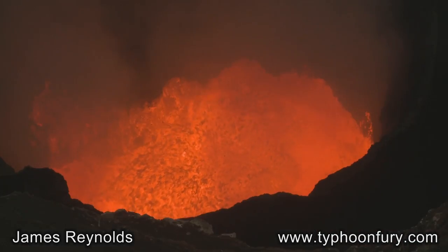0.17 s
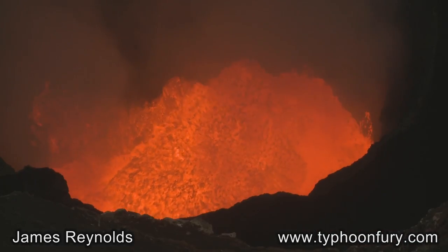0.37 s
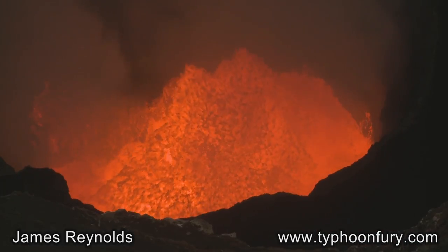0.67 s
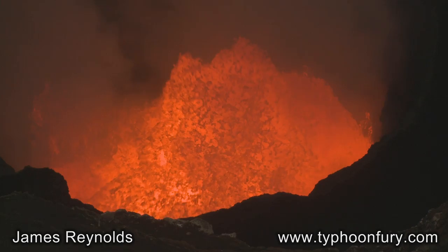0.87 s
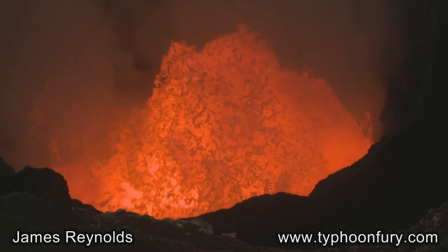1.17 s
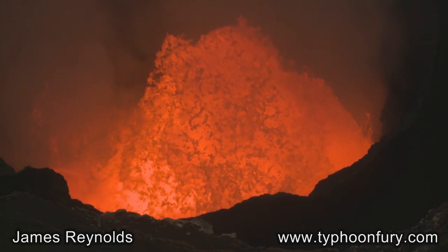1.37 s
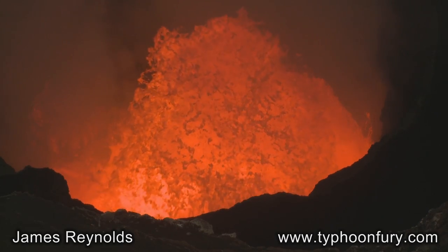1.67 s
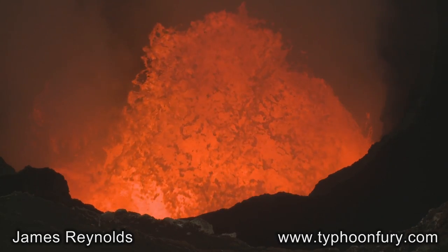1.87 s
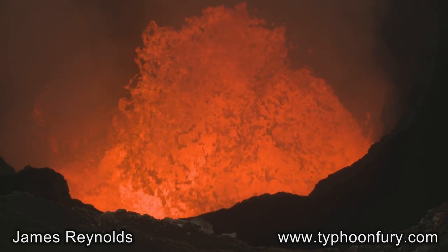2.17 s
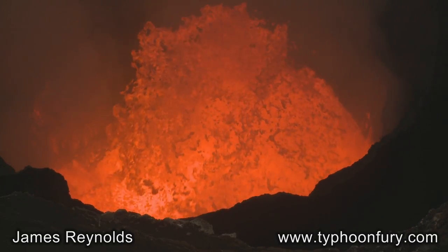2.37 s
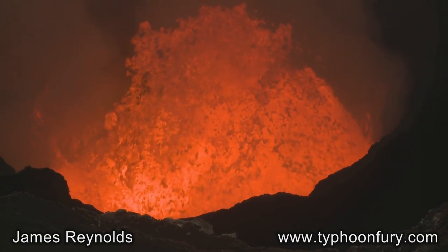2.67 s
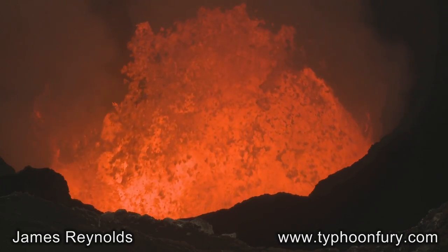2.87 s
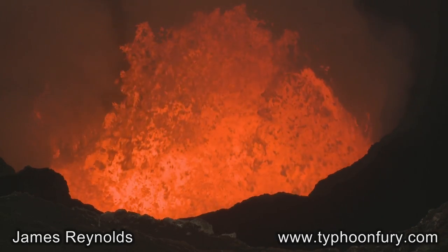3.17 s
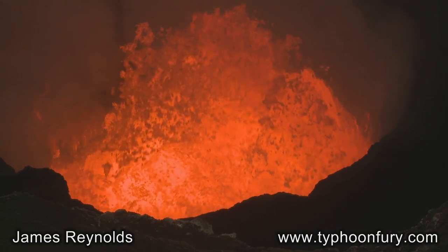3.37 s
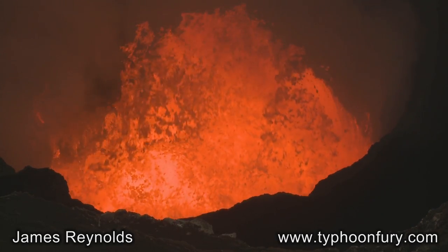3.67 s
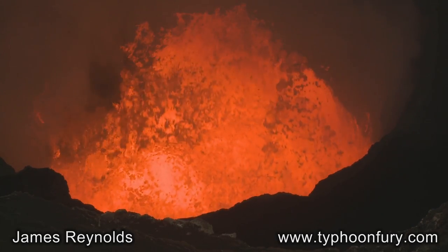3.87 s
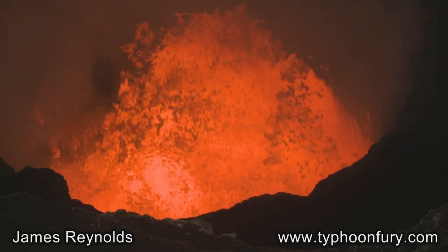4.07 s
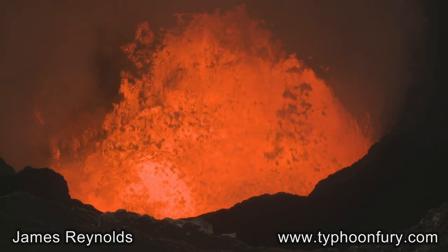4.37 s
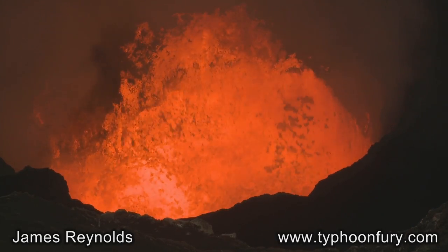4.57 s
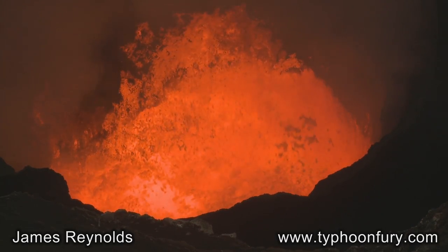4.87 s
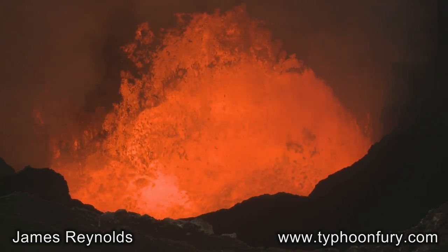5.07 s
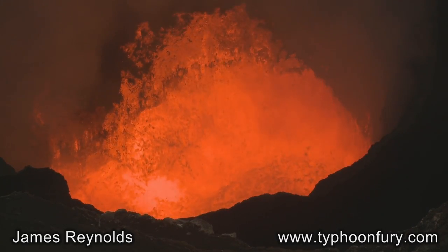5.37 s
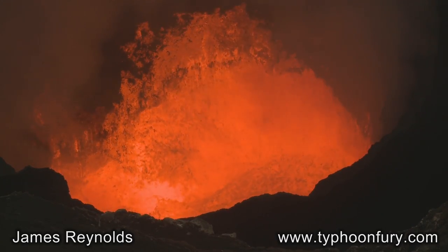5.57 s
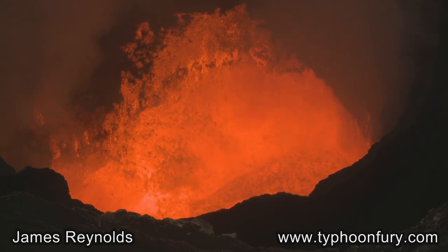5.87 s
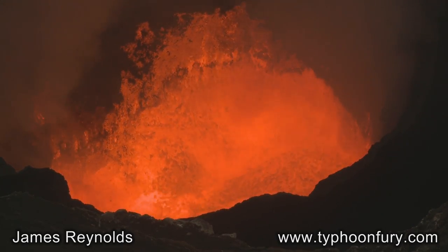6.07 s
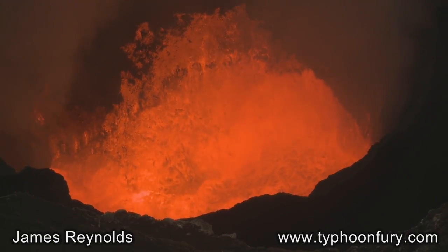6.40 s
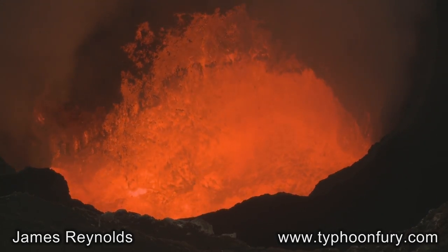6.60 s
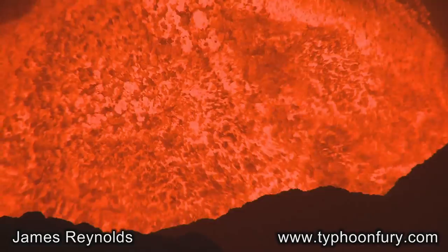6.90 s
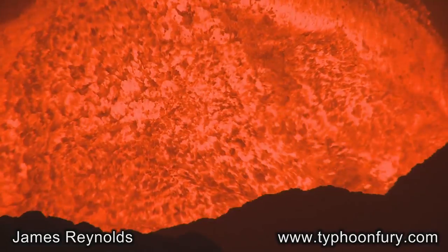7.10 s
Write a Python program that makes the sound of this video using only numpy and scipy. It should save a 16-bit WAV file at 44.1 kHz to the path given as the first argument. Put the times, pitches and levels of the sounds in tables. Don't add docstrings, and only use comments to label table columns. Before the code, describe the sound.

A churning lava lake gives a deep, uneven rumble and dull gassy roar with sparse grit ticks, then cuts abruptly to a windy wider view.

```python
import sys
import numpy as np
from scipy import signal
from scipy.fft import rfft, irfft, next_fast_len
from scipy.io import wavfile
from scipy.ndimage import uniform_filter1d, map_coordinates

SR = 44100
rng = np.random.default_rng(int(sys.argv[2]) if len(sys.argv) > 2 else 0)


def level_to_linear(level):
    exponent = np.asarray(level, float) / 20
    return 10 ** exponent


def materialize(psi):
    bounded = np.clip(np.atleast_2d(psi).T, -1, 1)
    quanta = np.round(bounded * 32767).astype(np.int16)
    wavfile.write(sys.argv[1], SR, quanta)


N = 319279
CUT_S = 6.937


def unit(x):
    return x / np.sqrt(np.mean(x ** 2) + 1e-20)


def along(points, hz):
    f, v = np.transpose(points)
    return np.interp(np.log(hz + 1), np.log(f + 1), v)


def curves(rows):
    s, *cols = np.transpose(rows)
    return [np.interp(np.arange(N) / SR, s, c) for c in cols]


def wobble(rate_hz):
    knots = rng.standard_normal(int(N * rate_hz / SR) + 4)
    return map_coordinates(knots, [np.arange(N) * rate_hz / SR])


def filtered(x, response):
    m = next_fast_len(N + 8192)
    return irfft(rfft(x, m) * response(np.fft.rfftfreq(m, 1 / SR)), m)[..., :N]


def rush(spectrum, patchy_db):
    z = signal.stft(rng.standard_normal(N), nperseg=512)[2]
    field = uniform_filter1d(rng.standard_normal(z.shape), size=5, axis=0)
    field = uniform_filter1d(field, size=10, axis=1)
    patched = signal.istft(z * level_to_linear(patchy_db * unit(field)), nperseg=512)[1][:N]
    return unit(filtered(patched, lambda hz: level_to_linear(along(spectrum, hz))))


def steady(x):
    swell = uniform_filter1d(uniform_filter1d(x ** 2, size=4000), size=4000)
    return unit(x / (np.abs(swell) + .05) ** .4)


def strikes(rows, scatter):
    out = np.zeros(N + SR)
    t = np.arange(2048) / SR
    for s, db, hz, crack_db, t60_s in rows:
        shape = level_to_linear(db - 60 * t / t60_s) * (1 - np.exp(-t / 0.00025))
        drift = np.cumsum(scatter * rng.standard_normal(len(t)))
        ring = np.sin(2 * np.pi * hz * t + drift)
        crack = level_to_linear(crack_db + 2) * np.diff(rng.standard_normal(len(t) + 1))
        out[round(s * SR):][:len(t)] += 3 * shape * (ring + crack)
    return out[:N]


def slugs():
    # (time [s], swell [dB], length [s], reach into the rumble [ratio])
    bursts = [(0.01, 8, .08, 0.66), (0.108, -5.5, 0.087, 0.13), (.43, -5, 0.083, 0.27),
              (0.617, -6, 0.062, 0.03), (0.735, 2, .07, 0.07), (.97, 2.5, .12, 1.2), (1.316, 4.5, 0.062, 0),
              (1.445, -4, 0.075, 0), (1.575, -2, 0.05, 0.01), (1.712, 4.5, 0.15, 0.03),
              (2.376, 0.5, 0.072, 1.1), (2.627, 5.5, .09, 0.6), (2.821, 3, 0.14, 0.16),
              (2.977, -4.5, 0.1, .5), (3.497, 3.5, 0.074, 0.06), (3.789, 3, 0.12, 0.52),
              (3.891, -4.5, 0.067, 0), (3.992, 8, 0.063, 0), (4.08, -5, 0.066, 0),
              (4.395, 5.5, 0.086, 0.08), (4.494, 3.5, .07, 0.03), (4.836, -1.5, 0.083, 1.9),
              (4.93, 3, 0.17, 0.99), (5.27, 3.5, 0.06, 0.4), (5.654, 2.5, .08, .3), (6.01, 5.5, 0.13, 0.55),
              (6.171, -1.5, .1, 0.83), (6.472, 2.5, 0.16, 0.94), (6.583, -4, .06, 0),
              (6.857, 7, 0.062, 0.26)]
    s, db, length_s, reach = np.transpose(bursts)
    t = np.arange(0, N, 64) / SR
    bell = db[:, None] * np.exp(-4 * ((t - s[:, None]) / length_s[:, None]) ** 2)
    deep_db, upper_db = bell.sum(0), reach @ bell
    return [np.interp(np.arange(N) / SR, t, c) for c in (deep_db, upper_db)]


def heave(level_db):
    # (frequency [Hz], density [dB per Hz])
    spectrum = [(4.7, -32), (8.0, 1), (32, 1.5), (90, -10), (120, -36), (200, -120)]
    return level_to_linear(level_db + 7.0) * steady(rush(spectrum, patchy_db=1.0))


def rumble(level_db):
    # (frequency [Hz], density [dB per Hz])
    spectrum = [(29, -27.5), (50, -1), (124, -6.5), (196, -12.5), (249, -24), (300, -23.5), (390, -48),
                (660, -120)]
    return level_to_linear(level_db + 3.0) * steady(rush(spectrum, patchy_db=-2.0))


def roar(level_db, burst):
    # (frequency [Hz], density [dB per Hz])
    spectrum = [(140, -28.5), (230, -0.5), (259, -5), (376, -2), (495, -10.5), (622, -7), (782, -16),
                (891, -15.5), (1200, -22), (1560, -52), (2640, -120)]
    return level_to_linear(level_db - 10.0 + .6 * burst) * rush(spectrum, patchy_db=0.84)


def gas(level_db, burst):
    # (frequency [Hz], density [dB per Hz])
    spectrum = [(800, -26.5), (1050, -3.5), (1330, -2.5), (1440, 0.5), (1680, -8.5), (2000, -4.5),
                (2280, -7), (2500, -6.5), (2700, -10.5), (2900, -17), (3800, -18), (5000, -25.5),
                (16000, -38.5)]
    return level_to_linear(level_db - 24.0 + 0.5 * burst) * rush(spectrum, patchy_db=1.25)


def lead_in():
    # (time [s], level [dB])
    fade = [
        (0, -45),
        (.008, -55.5),
        (.036, -56.5),
        (.044, -88),
    ]
    spectrum = [(150, -31), (350, 12), (1200, -12), (1750, 7), (2300, -14), (3400, 0.5),
                (4500, -9.0), (15000, -27.0)]
    return level_to_linear(curves(fade)[0]) * rush(spectrum, patchy_db=0.5)


def lake():
    # (time [s], churning [dB], venting [dB])
    activity = [(0, -40.5, -2), (.5, -41.5, -0.5), (1.1, -41.5, 0.5), (2.0, -44, -0.5), (2.6, -41.5, -0.5),
                (3.1, -42.5, 1), (4.3, -39.5, 0), (4.8, -39, -0.5), (5.4, -39.5, 2), (6.1, -38.5, 4),
                (6.5, -39, 5.5), (6.93, -42.5, 2)]
    churn_db, vent_db = curves(activity)
    deep_db, upper_db = slugs()
    mean_db = churn_db.mean()
    roar_db = mean_db + 0.6 * (churn_db - mean_db) + 0.5 * vent_db + 0.6 * upper_db
    burst = wobble(7)
    low = heave(churn_db + deep_db) + rumble(churn_db + upper_db)
    high = roar(roar_db, burst) + gas(mean_db + vent_db, burst)
    return low + high + lead_in()


def idle_track():
    spectrum = [(1, -14), (6, 0), (20, -9), (200, -28), (1000, -50)]  # (Hz, dB per Hz)
    drift = level_to_linear(-87) * rush(spectrum, patchy_db=.1)
    return level_to_linear(-86.5) + drift + level_to_linear(-89) * rng.standard_normal(N)


def grit(count, db):
    draw = rng.random((count, 3))
    rows = [(s * CUT_S, db + 9 * size, 1800 * 1.8 ** pitch, -14, .009) for s, size, pitch in draw]
    return strikes(rows, scatter=0.089)


def tent():
    # (time [s], level [dB])
    gust = [
        (.15, -94),
        (.3, -67.5),
        (.6, -74.5),
        (.82, -67.5),
        (.95, -92),
    ]
    # (frequency [Hz], density [dB per Hz])
    spectrum = [(1300, -42), (1900, 2), (2500, -1), (3000, -9.5), (4800, -12.5), (5600, -25), (9000, -81)]
    return level_to_linear(curves(gust)[0] + 1.6 * wobble(40)) * rush(spectrum, patchy_db=4.0)


def ticks():
    # (time [s], peak level [dB], third mode [dB], high modes [dB])
    hits = [(0.181, -64, -2, 1), (0.2488, -60, -14, -1), (0.846, -68, 8, -21), (1.3359, -63, -18, -17),
            (1.718, -56, -8, -19), (2.2223, -64, 3, -4), (2.4075, -65, 4.5, -18), (2.433, -58, -10, -19),
            (2.4928, -49.5, -3, -1), (3.1542, -57, -18, -17), (3.484, -61, 1.5, -6.5),
            (3.83, -59.5, -1, 2.5), (4.0425, -58.5, 2.5, -21), (4.361, -56, -7, -13), (4.802, -67, 5, -13),
            (5.04, -60.5, 3, -24), (6.031, -57.5, 2, -15), (6.5854, -48.5, -2, -9), (6.787, -46, -8, -5),
            (6.825, -58, 0.5, 3), (6.9184, -42.5, -11, -5.5)]
    # (frequency [Hz], relative t60 [ratio])
    shell = [(1100, 2.6), (2040, 1.32), (2560, 1.03), (3300, 0.35), (4350, 0.53), (5900, 0.63)]
    t60_s = 0.012
    rows = []
    for s, db, third_db, high_db in hits:
        mode_db = np.array([-11, -1.5, third_db + 1.5, high_db + 3, high_db, high_db - 10])
        for level_db, (hz, life) in zip(db + mode_db, shell):
            rows.append((s + 0.0017, level_db, hz, -24, t60_s * life))
    return strikes(rows, scatter=.045)


def taps():
    # (time [s], peak level [dB], ring [Hz], t60 [s])
    clots = [(0.396, -57, 696, 0.02), (1.219, -51.5, 700, 0.015), (2.4975, -48, 1040, 0.012),
             (4.4688, -42.5, 853, 0.017), (4.4685, -50, 646, 0.016), (4.4687, -58, 2600, 0.0092),
             (5.7255, -46, 664, 0.016), (5.893, -48.5, 600, 0.024), (6.446, -57, 660, 0.021),
             (6.586, -49, 1130, 0.018), (6.745, -46.5, 770, 0.021), (6.919, -50, 1130, 0.022)]
    crack_db = -36
    return strikes([(s, db, hz, crack_db, t60_s) for s, db, hz, t60_s in clots], scatter=0.01)


def wide_rush(spectrum, patchy_db):
    # (frequency [Hz], correlation [0-1])
    alike = [(60, 0.56), (130, 0.69), (290, 0.84), (640, 0.77), (1410, 0.64), (3100, 0.18), (6000, .1)]

    def turn(hz):
        return np.arccos(np.clip(along(alike, hz), -1, 1)) / 2

    mid = filtered(rush(spectrum, patchy_db), lambda hz: np.cos(turn(hz)))
    side = filtered(rush(spectrum, patchy_db), lambda hz: np.sin(turn(hz)))
    return unit(np.array([mid + side, mid - side]))


def buffet(level_db):
    # (frequency [Hz], density [dB per Hz])
    spectrum = [(6, -22), (12, -6.5), (45, -1), (65, -13.5), (120, -42.5), (300, -120)]
    return level_to_linear(level_db) * wide_rush(spectrum, patchy_db=0.0) * level_to_linear([[-3], [0.3]])


def close_lake(rumble_db):
    # (frequency [Hz], density [dB per Hz])
    low = [(30, -18.5), (60, -1.5), (85, -4.5), (140, -0.5), (250, -11), (330, -22.5), (500, -53),
           (900, -120)]
    # (frequency [Hz], density [dB per Hz])
    high = [(150, -38), (280, 0), (420, -1), (620, -1.5), (800, -6), (1400, -12.5), (2500, -13.5),
            (2900, -20), (3900, -23), (4400, -31), (9000, -38.5), (16000, -38)]
    roar_db = -56 + 0.75 * (rumble_db - rumble_db[0])
    return level_to_linear(rumble_db) * wide_rush(low, patchy_db=-3.0) + level_to_linear(roar_db) * wide_rush(high, patchy_db=0.9)


def rattle():
    # (time [s], peak level [dB], ring [Hz], crack [dB], t60 [s])
    knocks = [
        (7.051, -61.5, 10200, -6, 0.011),
        (7.052, -61, 15000, -13, 0.0084),
        (7.072, -74, 10400, -15, 0.032),
        (6.944, -67, 2900, -12, 0.0099),
        (7.166, -62, 2200, -10, 0.023),
        (7.187, -53, 1100, -25, .015),
        (7.196, -52.5, 1400, -22, 0.023),
        (7.2065, -41, 600, -31, 0.0097),
        (7.206, -74, 10000, -14, 0.009),
        (7.229, -65, 3100, -11, 0.036),
    ]
    return 0.68 * strikes(knocks, scatter=0.11)


def thud():
    start_s, level_db, hz, t60_s = 7.191, -33.5, 62.4, 0.28
    t = np.maximum(np.arange(N) / SR - start_s, 0)
    return level_to_linear(level_db - 60 * t / t60_s) * np.sin(2 * np.pi * hz * t)


def close_shot():
    # (time [s], wind level [dB], lake level [dB])
    levels = [
        (6.94, -52, -44.5),
        (6.98, -37.5, -50.5),
        (7.04, -40, -46),
        (7.1, -39, -48),
        (7.17, -37.5, -44.5),
        (7.24, -38, -42.5),
    ]
    wind_db, rumble_db = curves(levels)
    hiss = level_to_linear(-80) * rng.standard_normal((2, N))
    air = buffet(wind_db) + close_lake(rumble_db) + hiss + rattle()
    return air * level_to_linear([[-5.5], [0.3]]) + thud()


def scene():
    first = lake() + grit(count=160, db=-71.5) + tent() + ticks() + taps()
    after = np.clip((np.arange(N) / SR - CUT_S) / 0.0032, 0, 1)
    return (1 - after) * np.array([first, idle_track()]) + after * close_shot()


def companded(x):
    size = np.minimum(np.abs(x) * 32768 + 132, 32767)
    step = 2 ** (np.floor(np.log2(size)) - 4)
    return np.sign(x) * ((np.floor(size / step) + .5) * step - 132) / 32768


def top_cut(x):
    return signal.sosfilt(signal.butter(12, 15890, fs=SR, output="sos"), x)


def record(dry):
    top_hz = 15830
    mix = filtered(companded(dry), lambda hz: hz < top_hz)
    return top_cut(mix)


dry = scene()
out = record(dry)
materialize(out)
```